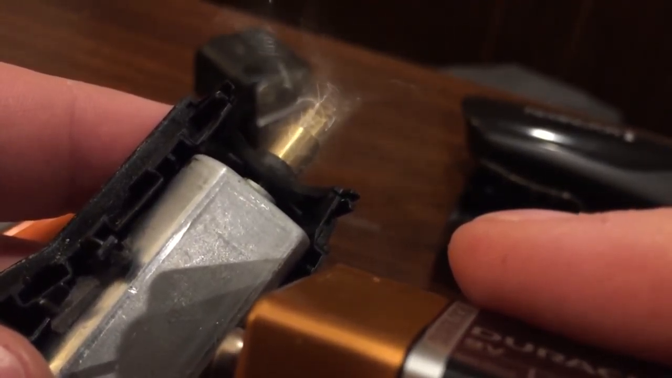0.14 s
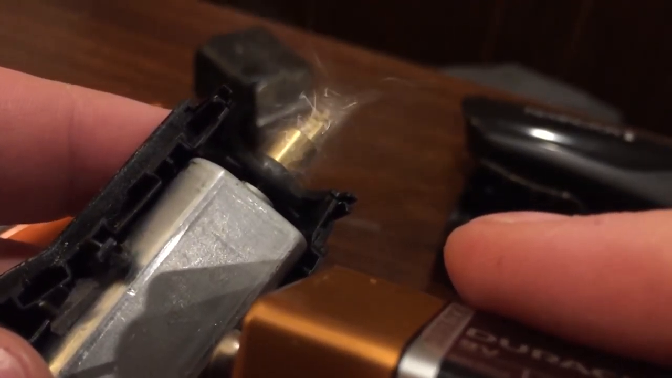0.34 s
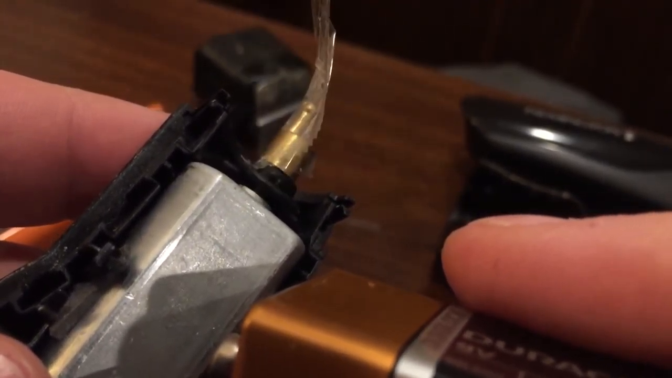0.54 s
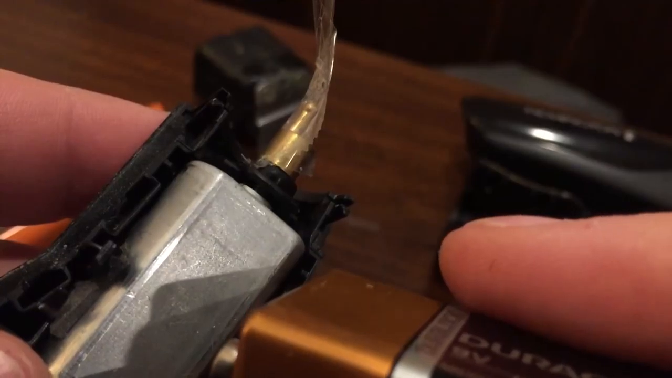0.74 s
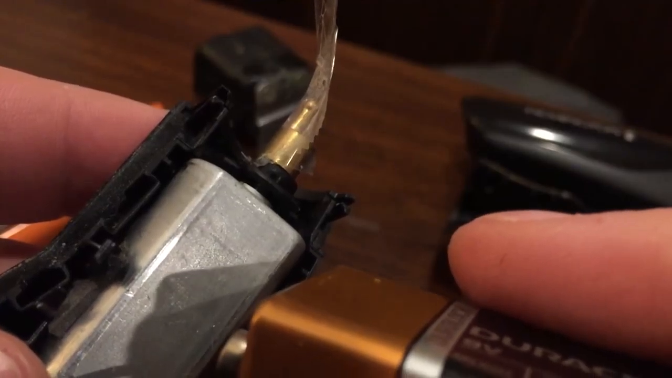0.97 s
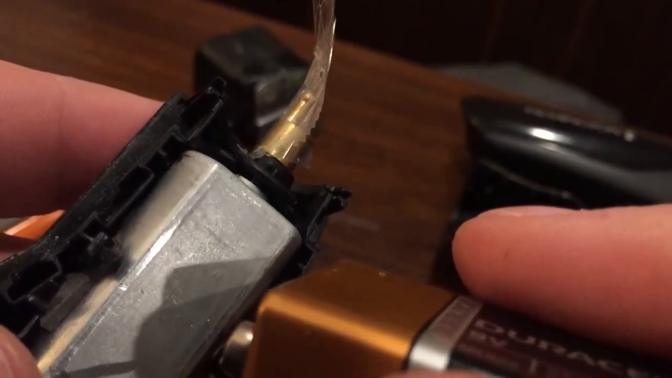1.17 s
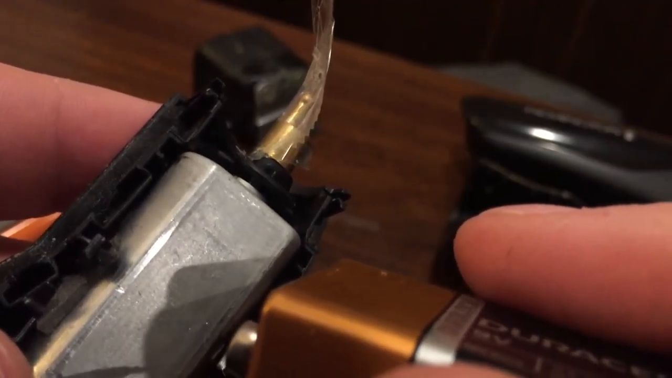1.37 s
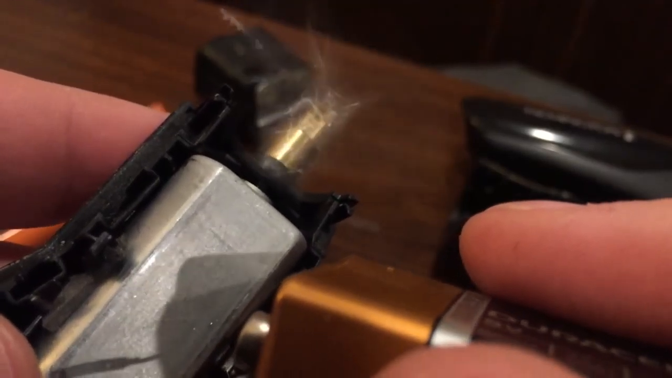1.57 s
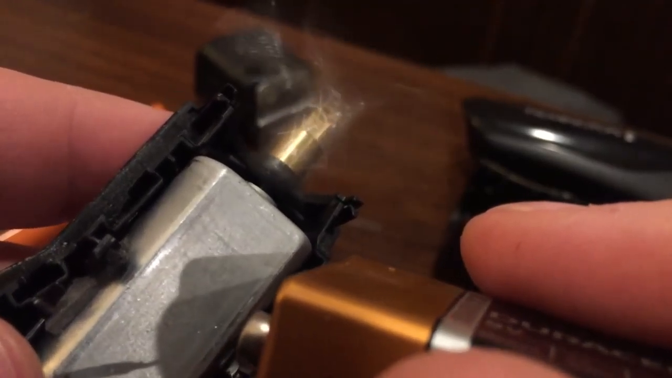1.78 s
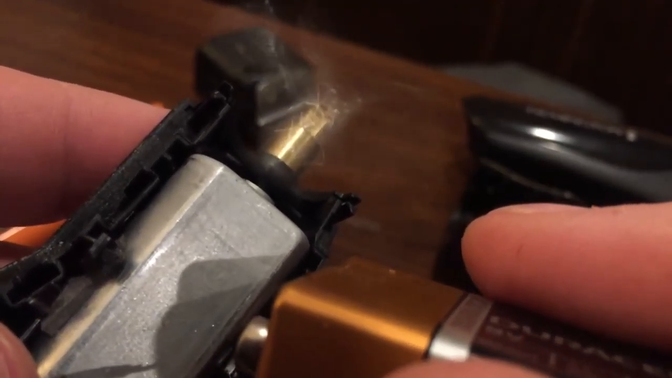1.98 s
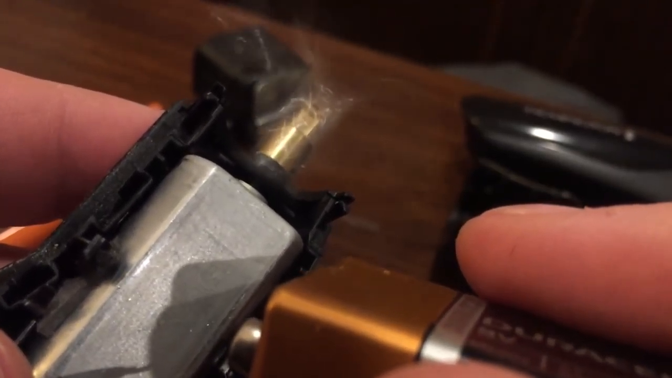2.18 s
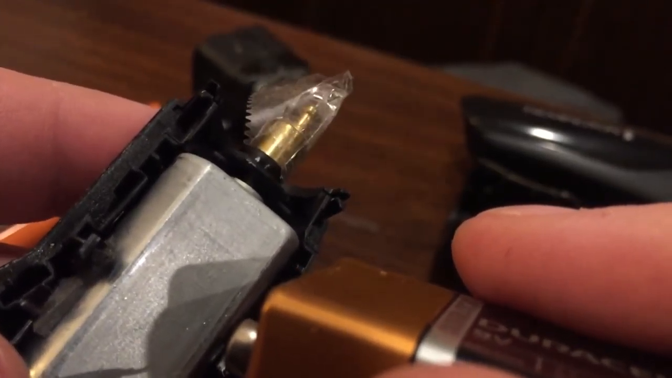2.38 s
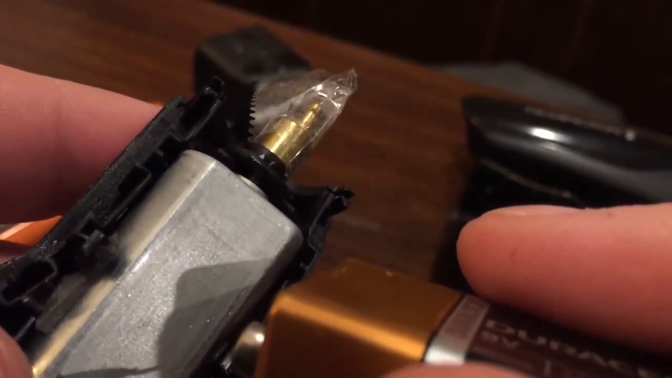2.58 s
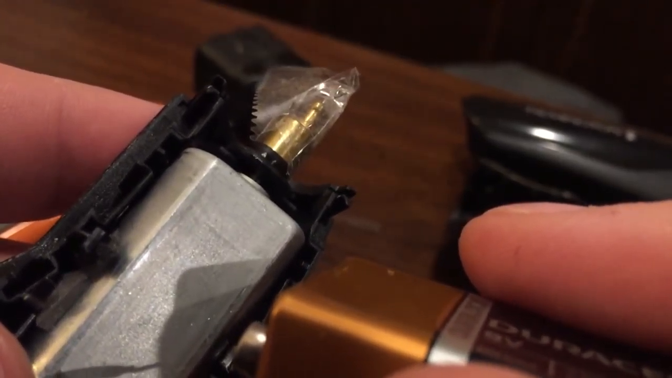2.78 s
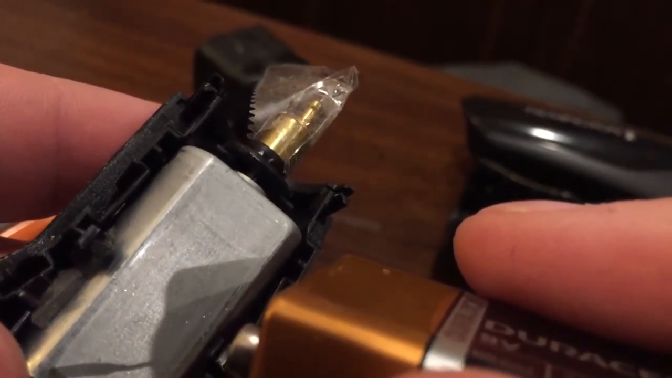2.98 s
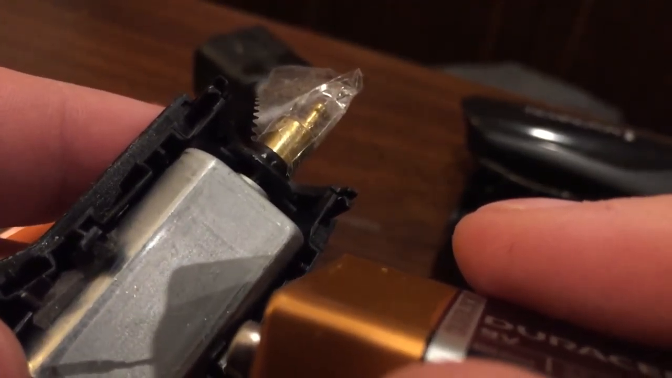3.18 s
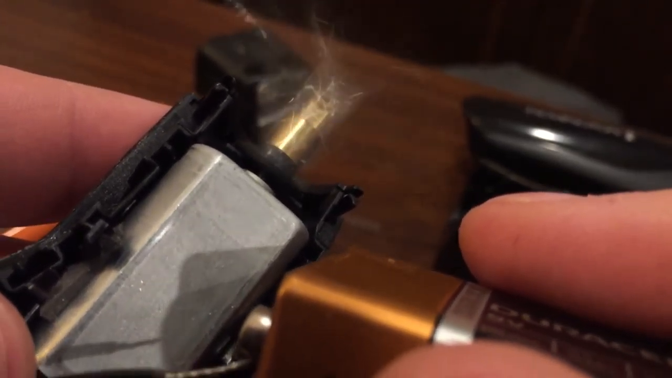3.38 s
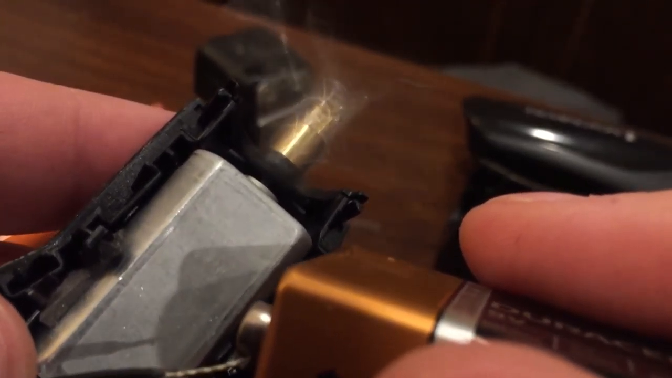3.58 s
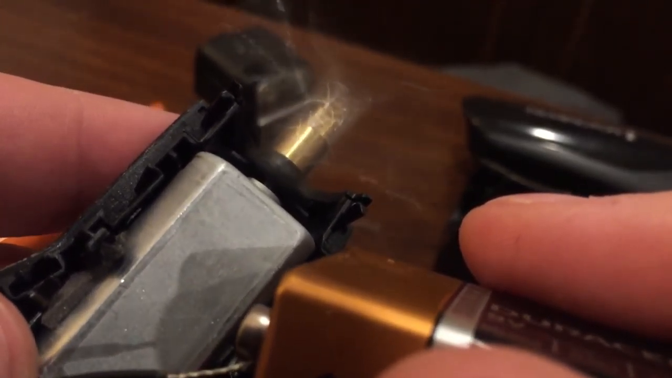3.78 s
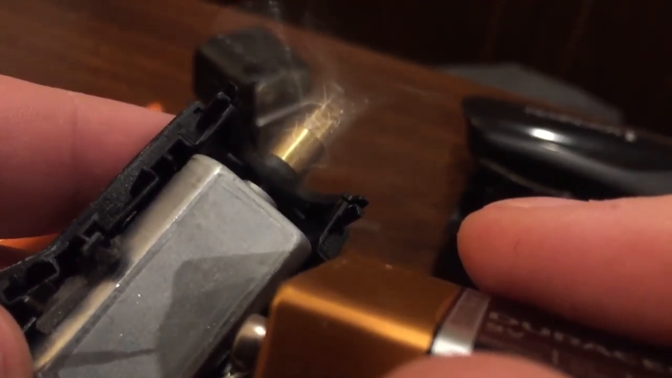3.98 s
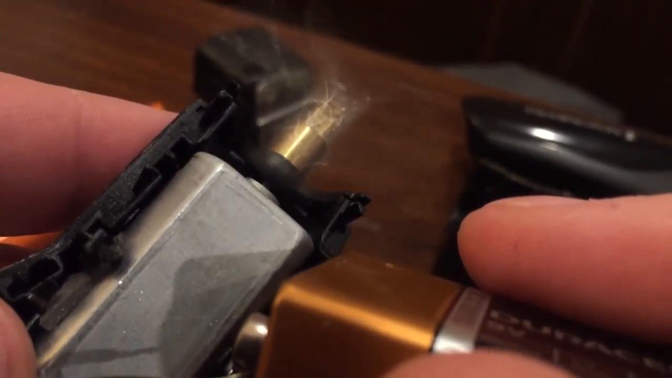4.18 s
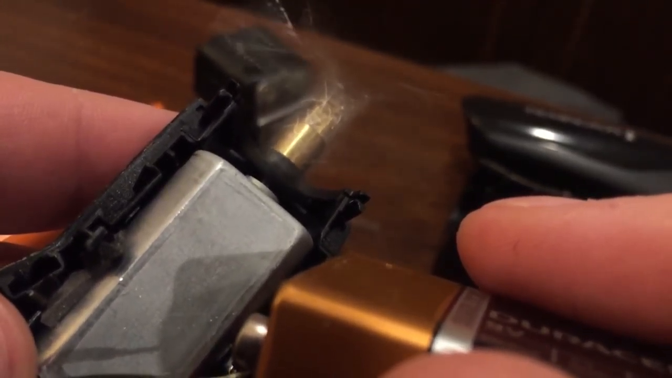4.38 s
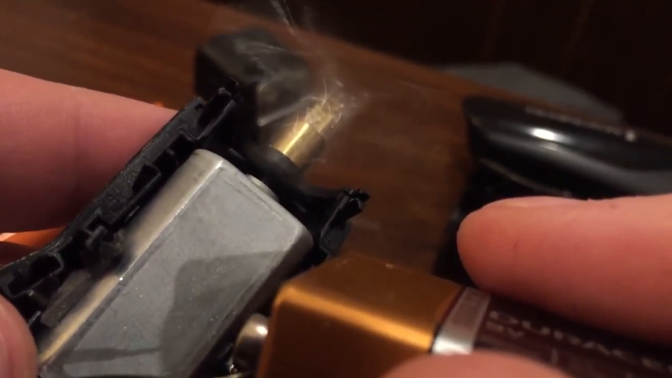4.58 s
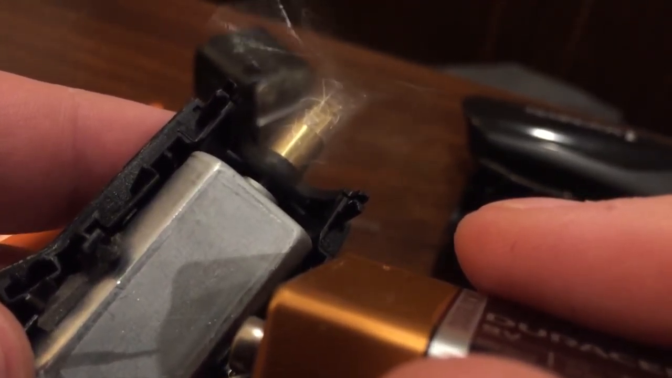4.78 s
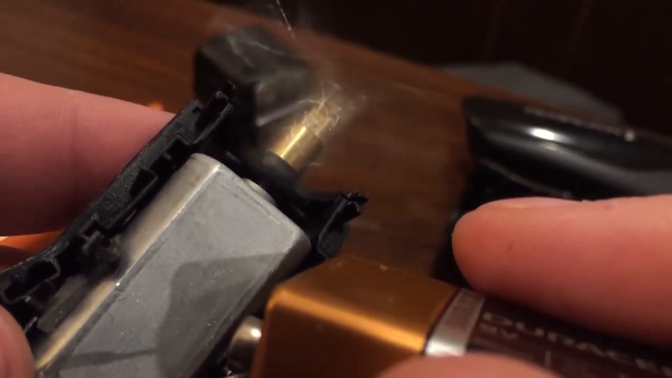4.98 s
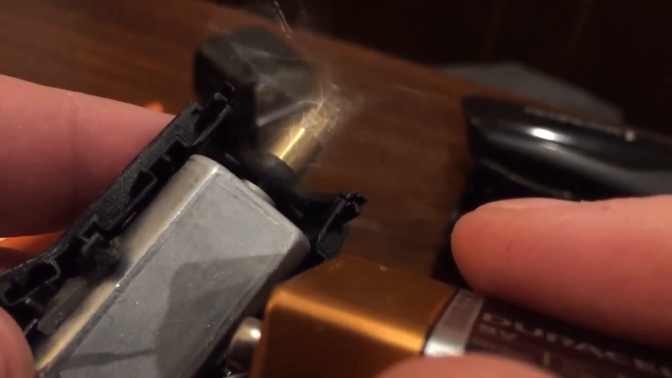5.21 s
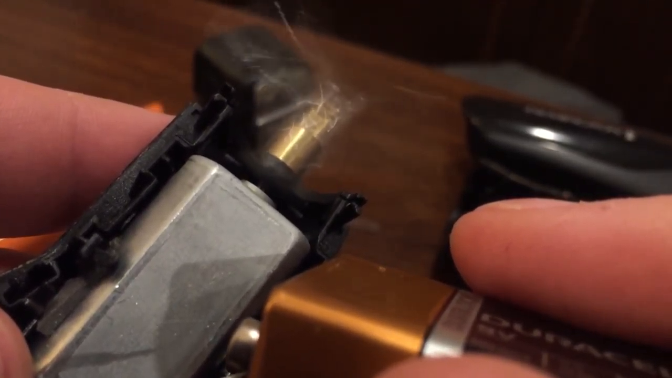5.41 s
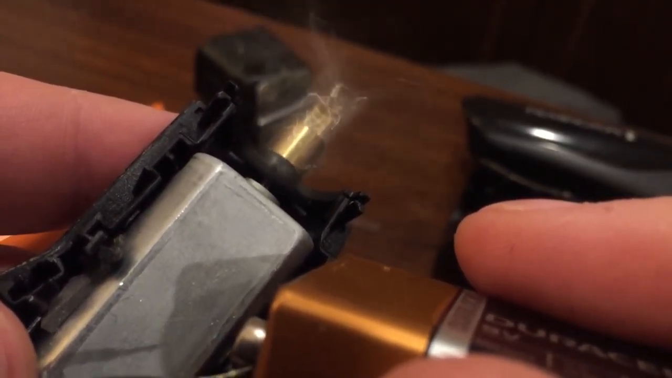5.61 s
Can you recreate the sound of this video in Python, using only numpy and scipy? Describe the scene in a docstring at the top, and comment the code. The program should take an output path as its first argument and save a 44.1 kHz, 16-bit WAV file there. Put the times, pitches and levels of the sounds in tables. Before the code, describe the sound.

A small electric motor hums and scratches close by in three short bursts, with tiny ticks in the quiet gaps.

```python
"""A small motor with a tape flag

A three-pole DC motor runs off a battery in three bursts, close by; the loose contact drops out at times.
A flag of tape on its shaft pushes the air once a turn and hums. The brushes knock and scratch over the
commutator (the spinning contacts) and ring the steel can. Between runs the wire ticks on the terminal,
fingers rub on plastic and a metal part pings, over the faint rush of a small room."""
import sys
import numpy as np
from scipy import signal
from scipy.fft import rfft, irfft, next_fast_len
from scipy.io import wavfile
from scipy.ndimage import uniform_filter1d, map_coordinates

SR = 44100
rng = np.random.default_rng(int(sys.argv[2]) if len(sys.argv) > 2 else 0)


def store_wav(level_fs):
    """Save 16-bit WAV to argv[1]."""
    pcm = np.round(np.clip(np.atleast_2d(level_fs), -1, 1) * 32767)
    wavfile.write(sys.argv[1], SR, pcm.T.astype(np.int16))


N = 249165
T = np.arange(N) / SR
FFT_SIZE = 2 * next_fast_len(N // 2 + SR // 4)
HZ = np.fft.rfftfreq(FFT_SIZE, 1 / SR)

# Levels in the tables are relative. A mode is a pitch at which something likes to ring.
# tone of the room's rush: (frequency [Hz], level [dB])
RUSH_TONE = [(18, -69), (30, -33), (81, -16.5), (118, -22), (266, -14.5), (295, -10.5), (364, -2.5),
             (415, -14), (449, -7), (569, -4.5), (962, -22), (1720, -26.5), (2290, -27), (4080, -39),
             (16000, -49.5)]
# drones in the room: (frequency [Hz], width [Hz], level [dB])
DRONE_MODES = [(92, 18, -8), (375, 14, -6), (582, 89, -1), (688.4, 68, -2.5), (1102, 110, -14),
               (1300, 40, -16), (1400, 81, -15.5), (1670, 42, -7.5)]
# fingers rub on the plastic: (time [s], level [dB], rise time [s])
FINGER_RUBS = [(.755, -59.5, .013), (.8, -63.5, .003), (1.035, -66.5, .018), (1.095, -63, 0.014),
               (1.14, -69, 0.011), (1.313, -58.5, 0.011), (1.377, -64, .005), (1.485, -67, 0.013),
               (1.61, -55, 0.02), (2.626, -61.5, 0.0048), (2.858, -56.5, 0.0068), (3.297, -60.5, 0.0049)]
# tone of a rub: (frequency [Hz], level [dB])
RUB_TONE = [(300, -12), (2000, 4), (4300, 3), (7300, 1), (9000, -13), (16000, -20)]
# ticks of wire, tape and slow rotor: (time [s], level [dB], treble share [dB], half-width [s])
TICK_EVENTS = [(0.4617, -18, -7, 0.0011), (0.4978, -16, -8, 0.0021), (0.864, -43.5, -22, 0.0011),
               (0.877, -38, -23, 0.0015), (1.6274, -32, -18, 0.00069), (1.6368, -22.5, -12, 0.0008),
               (1.652, -16, -5, 0.002), (1.6785, -19, -15, 0.001), (1.698, -14, -20.5, 0.001),
               (2.379, -17.5, -6.5, 0.0011), (2.471, -39.5, -28, 0.0012), (3.157, -22.5, -23, 0.0012),
               (3.3179, -38.5, -21.5, 0.00068), (3.3527, -39, -20, 0.001), (3.375, -30.5, -25, 0.0012),
               (3.454, -30.5, -15, 0.0016), (3.47, -31, -8, 0.0086), (3.486, -12.5, -9, 0.0015),
               (3.5087, -14.5, -10, 0.001)]
# modes of the can and its plastic cradle: (frequency [Hz], width [Hz], level [dB])
BODY_MODES = [(313, 78, -11), (520, 200, -15), (694, 310, -18.5), (893, 140, -12), (939, 210, -8.5),
              (1140, 180, -15.5), (1422, 625, -5), (1610, 190, -17), (1934, 318, 2), (2290, 230, -16.5),
              (2755, 500, -1), (3548, 440, 2), (4034, 600, 1), (4480, 230, 1.5), (5042, 350, 2),
              (5360, 840, -5), (5947, 820, -8.5), (6725, 440, -7), (7300, 950, -9), (8750, 1300, -10),
              (9870, 650, 0), (10770, 810, -0.5), (11560, 490, 1), (12600, 1200, -4.5), (13700, 900, -2),
              (15200, 1700, -12)]
# the can's strongest mode: (frequency [Hz], width [Hz], level [dB])
CAN_MODE = [(4470, 310, 0)]
# the wire touches the battery: (start [s], end [s], speed the motor heads for [turns/s])
BATTERY_TOUCHES = [(0, .242, 143.4), (.257, .343, 143.4), (.381, .422, 143.4), (1.642, 2.299, 137.5),
                   (3.48, 3.56, 172), (3.56, 4.742, 143.8), (4.782, 5.65, 143.8)]
# the shaft rubs harder, slows and scratches: (time [s], drive lost [share])
DRAG_SPELLS = [(.117, .197), (.222, .141), (2.075, .06), (3.914, .138), (4.245, .104), (4.632, .154),
               (4.986, .117), (5.297, .167), (5.601, .121)]
# the flag's push at 1, 2 and 3 times the turning rate: (level [dB], head start [cycles])
FLAG_HARMONICS = [(2.5, -0.36), (-10.5, -0.33), (-31, -0.25)]
# tone of the air stirred by the flag: (frequency [Hz], level [dB])
WAKE_TONE = [(20, -22), (50, -2), (90, 2), (200, 0), (400, -11.5), (900, -19.5), (3000, -59)]
# a faster flag hums louder: (speed [turns/s], level [dB])
HUM_BY_SPEED = [(20, -70), (40, -49), (65, -32), (90, -24.5), (127, -19), (144, -16.5)]
# the six brush crossings of a turn: (angle [turns], knock [dB], friction [dB])
BRUSH_CROSSINGS = [(0.117, -5.5, -2.5), (0.275, -0.5, -6.5), (0.477, 2.5, -4.5), (0.559, -11, -6),
                   (0.746, -7, -10), (0.889, 0, -14)]
# tone of the knocks: (frequency [Hz], level [dB])
KNOCK_TONE = [(100, -2), (300, -3), (700, 2), (2000, 0), (3500, 0), (6000, 0.5), (10000, -10.5),
              (16000, -27)]
# tone of the scratching: (frequency [Hz], level [dB])
SCRATCH_TONE = [(100, -24.5), (600, -8.5), (2000, -10), (3500, -5), (6000, 1), (10000, -4), (16000, -3)]
# how loud each brush sound is: (base level [dB], rise per doubling of speed [dB],
# drop below chatter speed [dB], rise per unit of drag [dB], random waver [dB])
KNOCK_LOUDNESS = (-28.5, 2.5, 1.5, 2, 1)
SCRATCH_LOUDNESS = (-22, 5, 1.5, 6, 0.68)
RING_LOUDNESS = (-25.5, 5.5, -0.5, 3, 0.4)
# the can rings out and the scratching surges for a moment: (time [s], change in ring [dB], change in scratch
# [dB])
BRIEF_SWELLS = [(.34, 1, 1), (1.838, 7.5, 3), (1.93, 4, 3), (2.075, -3, 5), (2.2, 4, 1.5), (2.283, 3.5, 3),
                (3.616, 10.5, 5.5), (3.68, -3, 5), (3.915, -2, 4), (4.11, 6, 1), (4.255, 4, 2), (4.63, 3, 3),
                (4.94, 4, 4.5), (5.16, 3, 1.5), (5.3, 0, 3), (5.48, 7, 2), (5.62, 1, 3.5)]
# a high sizzle fades early on: (time [s], level [dB])
SIZZLE_FADE = [(0, -30), (.24, -34.5), (.35, -38), (.5, -75)]
# pitch of that sizzle: (frequency [Hz], width [Hz], level [dB])
SIZZLE_BAND = [(10700, 650, 0)]


def amp(db):
    """Turn decibels into a factor to multiply by."""
    return 10 ** (np.asarray(db) / 20)


def unit(x):
    """Scale a signal to an average (rms) level of 1."""
    return x / np.sqrt(np.mean(x ** 2) + 1e-20)


def wobble(rate):
    """A smooth random curve through `rate` random points a second."""
    return map_coordinates(rng.standard_normal(int(N * rate / SR) + 4), [T * rate])


def bumps(events, half_width_s):
    """Smooth humps, one for each (time, height)."""
    return sum(height * np.exp(-np.minimum(((T - s) / half_width_s) ** 2, 20)) for s, height in events)


def tone(points):
    """A filter curve that joins (frequency [Hz], level [dB]) points."""
    hz, db = np.transpose(points)
    return amp(np.interp(np.log(HZ + 1), np.log(hz), db))


def resonances(modes):
    """A filter curve with a steep peak at each mode."""
    return np.sqrt(sum((amp(db) / (1 + (2 * (HZ - hz) / width) ** 2)) ** 2 for hz, width, db in modes))


def filtered(x, curve):
    """Shape a sound by a filter curve, so that it rings only after it is struck."""
    cepstrum = irfft(np.log(np.maximum(curve, 1e-6)))[:FFT_SIZE // 2]
    cepstrum[1:] *= 2
    return irfft(rfft(x, FFT_SIZE) * np.exp(rfft(cepstrum, FFT_SIZE)))[:N]


def noise(curve):
    """Steady noise of level 1, shaped by a filter curve."""
    return unit(filtered(rng.standard_normal(N), curve))


def pulses(times, sizes):
    """Sharp clicks that can fall between samples."""
    at = times[:, None] * SR
    taps = np.floor(at).astype(int) + np.arange(-7, 9)
    shape = np.sinc(taps - at) * np.cos(np.pi * (taps - at) / 16) ** 2
    return np.bincount(np.clip(taps, 0, N).ravel(), (sizes[:, None] * shape).ravel(), N + 1)[:N]


def room_air():
    """The room's steady rush, with a few narrow drones in it."""
    return amp(-52.5) * noise(tone(RUSH_TONE)) + amp(-53) * noise(resonances(DRONE_MODES))


def room_echo(x, fade_s):
    """The desk and walls send back a short blur of echoes."""
    t = T[:SR // 3]
    tail = rng.standard_normal(len(t)) * amp(-60 * t / fade_s) * (t > .002)
    reflected = filtered(x, tone([(150, -23.5), (600, 7.5), (6000, -0.5), (15000, -4.5)]))
    return signal.fftconvolve(reflected, tail / np.linalg.norm(tail))[:N]


def fingers():
    """Skin slides softly on the plastic as the grip shifts."""
    pressure = np.zeros(N)
    for s, db, rise_s in FINGER_RUBS:
        age = T[:SR // 10] / rise_s
        shape = (age * np.exp(1 - age)) ** 2
        pressure[round(s * SR):][:len(shape)] += amp(db) * shape
    return pressure * amp(2.5 * wobble(330)) * noise(resonances(BODY_MODES) * tone(RUB_TONE))


def metal_ping(start_s=.864, hz=1690, db=-39, fade_s=.04):
    """A small metal part is nudged and rings faintly."""
    age = np.maximum(T - start_s, 0)
    return amp(db - 60 * age / fade_s) * np.sin(2 * np.pi * hz * age)


def ticks():
    """Tiny scrapes of wire, tape and rotor sound through the can and cradle."""
    dull, bright = np.zeros(N), np.zeros(N)
    lead = SR // 50
    t = np.arange(-lead, 2 * lead) / SR - .0016  # a scrape peaks just after first contact
    trailing_chatter = amp(-17) * (t > 0) * np.exp(-abs(t) / .004)
    for s, db, treble_db, half_width in TICK_EVENTS:
        shape = np.exp(-(t / half_width) ** 2) + trailing_chatter
        scrape = amp(db - 1) * shape * rng.standard_normal(len(t))
        treble_share = np.clip(amp(treble_db), 0, .95)
        start = round(s * SR) - lead
        dull[start:][:len(t)] += (1 - treble_share) * scrape
        bright[start:][:len(t)] += treble_share * scrape
    body = resonances(BODY_MODES)
    dull_tone = tone([(300, -17), (2000, -3.5), (4500, -1), (7000, 3), (10000, -10)])
    bright_tone = tone([(4000, -40), (9000, 5), (16000, 7.5)])
    return filtered(dull, body * dull_tone) + filtered(bright, body * bright_tone)


def shaft_speed(drag, start_speed=121., spin_up_s=.124, braking_per_s=1224):
    """Turns a second: the rotor speeds up with current, brakes without it and sags under drag."""
    speed = np.full(N, start_speed)
    for on, off, free_speed in BATTERY_TOUCHES:
        first = round(on * SR)
        t = T[first:]
        powered_s = np.minimum(t, off) - on
        driven = free_speed + (speed[first] - free_speed) * np.exp(-powered_s / spin_up_s)
        speed[first:] = np.maximum(driven - braking_per_s * np.maximum(t - off, 0), 1)
    step = 1 / (spin_up_s * SR)
    sag = signal.lfilter([step], [1, step - 1], drag)  # the rotor is slow to respond
    return speed * (1 - sag)


def cradle_whine(speed, turns, harmonic=16, mode_hz=1990, width_hz=90):
    """One overtone of the shaft swells into a whine as it passes a mode of the cradle."""
    nearness = np.exp(-((harmonic * speed - mode_hz) / width_hz) ** 2)
    level = amp(-33.5 + 2.7 * wobble(45)) * nearness
    return level * np.sqrt(2) * np.sin(2 * np.pi * harmonic * turns + .5 * wobble(60))


def flag_hum(speed, turns, cradle_hz=335, width_hz=21, boost_db=14):
    """The tape pushes and stirs the air each turn; overtones swell near the cradle's own pitch."""
    hum = np.zeros(N)
    for harmonic, (db, head_start) in enumerate(FLAG_HARMONICS, 1):
        swell_db = boost_db / (1 + (2 * (harmonic * speed - cradle_hz) / width_hz) ** 2)
        hum += amp(db + swell_db) * np.cos(2 * np.pi * (harmonic * turns + head_start))
    wake = speed / speed.max() * noise(tone(WAKE_TONE))
    level = amp(np.interp(speed, *np.transpose(HUM_BY_SPEED)))
    return level * (unit(hum) * amp(0.49 * wobble(40)) + amp(-21) * wake)


def brush_level(loudness, speed, drag, coasting, cruise_speed=135, chatter_speed=119):
    """Level of one brush sound in dB: it follows speed, drag and the rotor's chatter in its bearings."""
    base_db, doubling_db, calm_db, drag_db, waver_db = loudness
    calm = (1 - np.tanh((speed - chatter_speed) / 4)) / 2  # near 1 when too slow to chatter
    doubling_db = doubling_db + 6 * coasting  # fades faster with no current
    speed_db = doubling_db * np.log2(speed / cruise_speed) - calm_db * calm
    return base_db + speed_db + drag_db * drag + waver_db * wobble(25)


def brush_contact(speed, turns, jitter_s=.000013, play_turns=.004, arc_turns=.055):
    """Each brush crossing gives a knock and a short swell of friction, never quite the same twice."""
    knocks, pressure = np.zeros(N), np.zeros(N)
    for angle, knock_db, friction_db in BRUSH_CROSSINGS:
        position = turns - angle - play_turns * wobble(5)  # the rotor wanders in its bearings
        times = np.interp(np.arange(int(turns[-1])), position, T)
        late, soft, rough = rng.standard_normal((1000, 3))[:len(times) + 2].T
        knocks += pulses(times + jitter_s * late[:-2], amp(knock_db - 0.3 * soft[:-2]))
        nearest = np.round(position).astype(int)
        swell = np.exp(-((position - nearest) / arc_turns) ** 2)
        pressure += swell * amp(friction_db + 2 * np.minimum(rough[nearest], 2))
    # the lopsided rotor bears down once a turn, most unevenly while it is slow
    depth_db = 1.6 * np.clip(120 / speed, 0, 1.5) ** 2
    lean = amp(depth_db * (np.cos(2 * np.pi * (turns - .22)) - 0.37))
    friction = lean * (unit(pressure) + 0.37) * rng.standard_normal(N)
    return unit(knocks), unit(friction)


def brush_noise(speed, turns, knock_db, scratch_db, ring_db, swell_s=.022):
    """Knocks and friction shake the can and cradle, which rattle, scratch, ring and sizzle."""
    knocks, friction = brush_contact(speed, turns)
    scratch_db = scratch_db + bumps([(s, db) for s, _, db in BRIEF_SWELLS], swell_s)
    ring_db = ring_db + bumps([(s, db) for s, db, _ in BRIEF_SWELLS], swell_s)
    sizzle_db = np.interp(T, *np.transpose(SIZZLE_FADE))
    body = resonances(BODY_MODES)
    rattle = amp(knock_db) * unit(filtered(knocks, body * tone(KNOCK_TONE)))
    scratch = amp(scratch_db) * unit(filtered(friction, body * tone(SCRATCH_TONE)))
    ring = amp(ring_db) * unit(filtered(0.49 * knocks + friction, resonances(CAN_MODE)))
    sizzle = amp(sizzle_db) * unit(filtered(friction, resonances(SIZZLE_BAND)))
    return rattle + scratch + ring + sizzle


def motor():
    """One spinning shaft sets the pace of the hum, the brush noise and the whine."""
    drag = bumps(DRAG_SPELLS, half_width_s=.058)
    speed = shaft_speed(drag)
    powered = sum(1. * ((T >= on) & (T <= off)) for on, off, _ in BATTERY_TOUCHES)
    coasting = 1 - uniform_filter1d(powered, size=200)
    running = np.clip((speed - 1) / 20, 0, 1)  # fades out as the shaft comes to rest
    levels_db = [brush_level(loudness, speed, drag, coasting)
                 for loudness in (KNOCK_LOUDNESS, SCRATCH_LOUDNESS, RING_LOUDNESS)]
    turns = np.cumsum(speed * (1 + 0.002007 * wobble(30))) / SR
    hum = flag_hum(speed, turns)
    brushes = brush_noise(speed, turns, *levels_db)
    return running * (hum + brushes + cradle_whine(speed, turns))


def scene():
    """The motor and its handling, close by in a quiet room, in mono."""
    near = motor() + ticks() + fingers() + metal_ping()
    return (near + amp(-11.5) * room_echo(near, fade_s=0.08) + room_air())[None]


def record(dry, ceiling=.8, top_hz=15750):
    """Round off the highest peaks and cut away the very top of the treble."""
    rounded = dry / (1 + (dry / ceiling) ** 8) ** (1 / 8)
    return irfft(rfft(rounded, FFT_SIZE) / (1 + (HZ / top_hz) ** 300))[:, :N]


dry = scene()
out = record(dry)
store_wav(out)
```